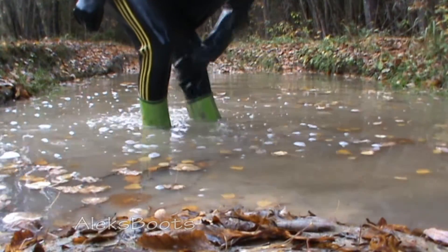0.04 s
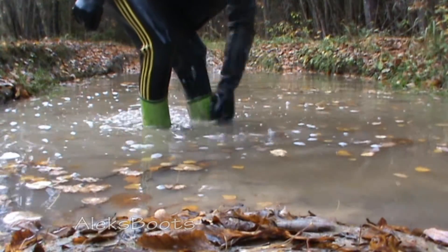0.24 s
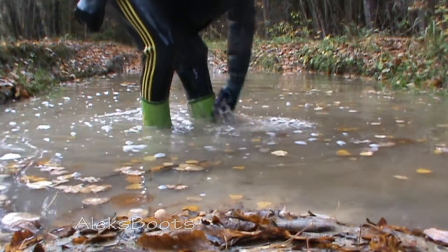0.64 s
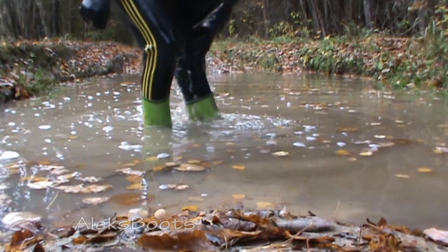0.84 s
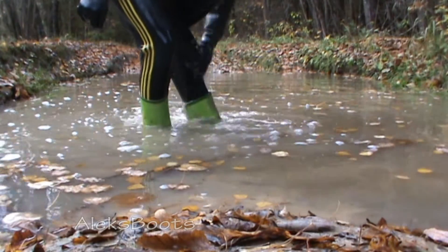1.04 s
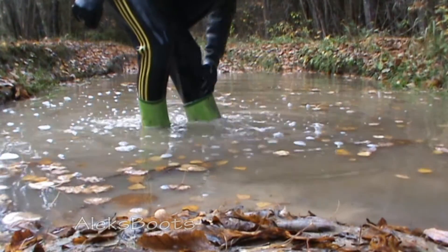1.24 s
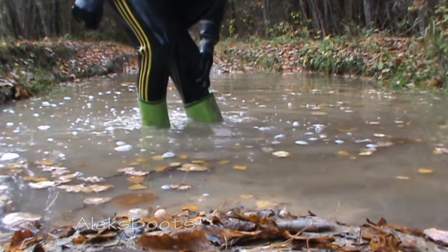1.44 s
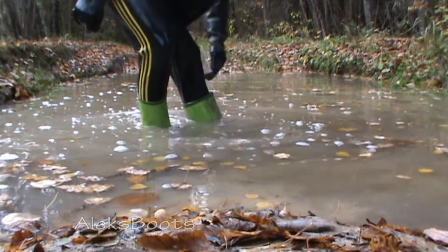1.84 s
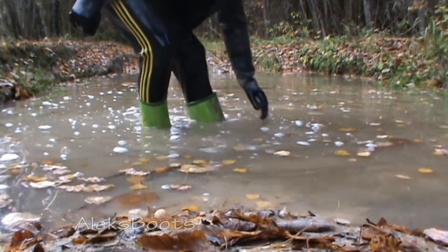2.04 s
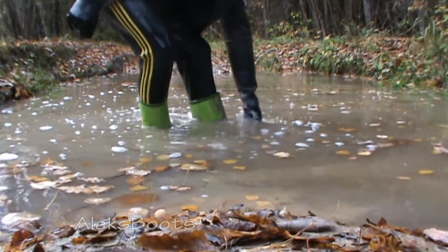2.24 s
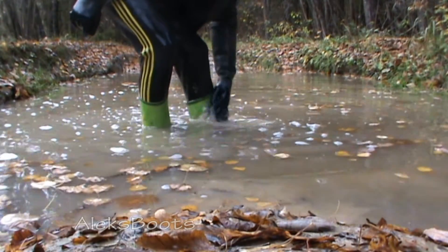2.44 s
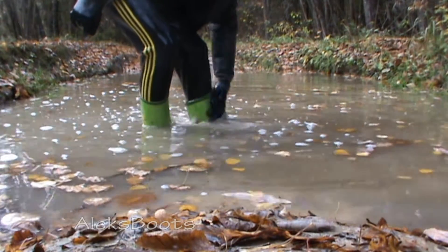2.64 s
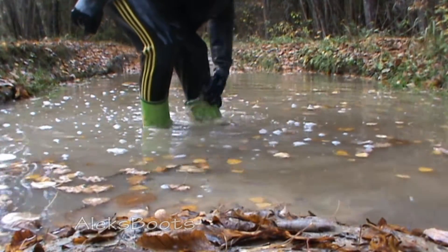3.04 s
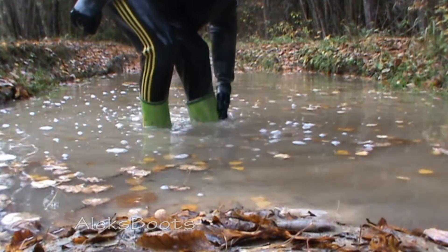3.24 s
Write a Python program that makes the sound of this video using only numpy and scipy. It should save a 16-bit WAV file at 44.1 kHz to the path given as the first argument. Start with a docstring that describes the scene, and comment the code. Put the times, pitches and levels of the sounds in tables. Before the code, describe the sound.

Pond water splashes and gurgles as a gloved hand scoops through it twice, a few metres away in a quiet wood. Drops patter back, a plop ends the first scoop, and faint dull boot knocks fall around the strokes.

```python
"""A gloved hand scoops and stirs a muddy pond twice, a few metres away in a wood.
The water churns with small rising bubbles, thrown drops patter back with a crack and a ping,
and one deep plop closes the first scoop as its cavity climbs in pitch.
A few dull knocks, probably rubber boots, fall around the strokes. The bank and the trees
add a short echo, and quiet outdoor air lies under it all."""
import sys
import numpy as np
from scipy import signal
from scipy.fft import rfft, irfft, next_fast_len
from scipy.io import wavfile
from scipy.ndimage import uniform_filter1d, map_coordinates

SR = 44100
rng = np.random.default_rng(int(sys.argv[2]) if len(sys.argv) > 2 else 0)


def generate_wav(signal):
    """Clip the signal to [-1, 1] and save it as 16-bit WAV at the path in sys.argv[1]."""
    frames = np.transpose(np.atleast_2d(signal))
    scaled = np.clip(frames, -1, 1) * 32767
    pcm = np.round(scaled).astype(np.int16)
    wavfile.write(sys.argv[1], SR, pcm)


N = 149940

# colour of the still air in the wood: frequency_hz, gain_db
AIR_TONE = [(20, -18), (55, 1.5), (105, -1.5), (330, -9), (1000, -14.5), (1220, -12), (2000, -21.5),
            (5000, -28.5), (10500, -24), (13500, -22.5), (15500, -58)]
# extra EQ on the air's side channel: frequency_hz, gain_db
AIR_SIDE_TONE = [(60, -23.5), (300, 5.5), (6000, 16), (13000, -2)]
# level envelopes of the two hand strokes: time_s, churn_db, spray_db
STROKE_LEVELS = [(0, -71, -58), (0.204, -61, -53), (.25, -53.5, -42), (.3, -45.5, -50), (0.394, -45.5, -51),
                 (0.415, -36.5, -36), (.475, -48.5, -48), (0.571, -46, -52), (0.588, -37.5, -42.5),
                 (.715, -35.5, -48), (.752, -43, -43), (.772, -45.5, -36), (.82, -45, -48),
                 (0.878, -41.5, -41), (0.961, -45, -48), (1.0, -57.5, -50), (1.04, -52.5, -45.5),
                 (1.1, -56, -52.5), (1.25, -60, -58.5), (1.67, -63, -60), (1.8, -80, -62.5),
                 (2.17, -66.5, -59), (2.3, -55, -54), (2.358, -45, -47.5), (2.42, -46, -50.5),
                 (2.49, -47.5, -52), (2.622, -49.5, -49.5), (2.638, -40.5, -37.5), (2.685, -42, -44.5),
                 (2.735, -45, -50.5), (2.79, -54, -55), (2.91, -55.5, -57), (2.966, -45, -47.5),
                 (3.083, -57, -59), (3.115, -55.5, -44.5), (3.145, -54, -54.5), (3.19, -50, -51),
                 (3.312, -65, -60.5), (3.4, -51.5, -49.5)]
# colour of the churning water: frequency_hz, gain_db
CHURN_TONE = [(60, -9), (200, -7.5), (400, -6), (700, -8), (1500, 3), (2500, 3), (4000, -7.5), (9000, -41)]
# colour of the spray: frequency_hz, gain_db
SPRAY_TONE = [(800, -11), (2600, -3), (4400, -0.5), (6000, 0.5), (7700, -6), (10000, 0.5), (13000, -9),
              (15500, -50)]
# drops hitting the surface: start_s, pitch_hz, level_db
DROP_HITS = [(0.0377, 4040, -36.5), (0.1216, 5750, -25.5), (0.247, 5140, -27), (0.2723, 8250, -27),
             (0.4176, 5400, -28), (0.4955, 10400, -29), (0.6267, 4760, -26), (0.6649, 3340, -17.5),
             (0.6685, 4500.0, -18), (0.7651, 4800, -14.5), (0.7658, 8400, -16), (0.791, 4400, -24),
             (0.8533, 3070, -20.5), (0.868, 5760, -17.5), (0.9363, 5500, -31.5), (0.9582, 5260, -16),
             (1.0392, 2940, -21.5), (1.136, 6200.0, -34), (1.3184, 7800, -33.5), (1.455, 5200, -39),
             (1.729, 4640, -38), (2.0545, 5200, -32), (2.406, 5450, -27.5), (2.517, 6860, -29),
             (2.568, 4440, -27.5), (2.58, 3670, -25.5), (2.6305, 6840, -18), (2.6694, 4070, -22),
             (2.703, 9600, -22.5), (2.7586, 7300, -23.5), (2.8425, 9100, -31.5), (3.108, 5630, -23.5),
             (3.1125, 4500, -26), (3.125, 6900, -32), (3.249, 6400, -26), (3.366, 5900, -34.5)]
# dull rubber knocks: start_s, level_db, t60_s, relative_bass_db
BOOT_KNOCKS = [(0.1174, -34.5, 0.029, 9.5), (0.126, -38.5, 0.041, 0), (1.508, -49.5, 0.07, 9.5),
               (1.665, -47.5, 0.018, 10.5), (2.1214, -33.5, 0.015, -22)]
# colour of a knock's slap: frequency_hz, gain_db
KNOCK_TONE = [(60, -26), (170, -48), (350, 8), (800, 10), (2400, -3.5), (3800, -2.5), (6000, -6.5),
              (14000, -15.5)]
# single bubbles of trapped air, plus a brief ring under the knock at 2.12 s: start_s, pitch_hz, level_db,
# t60_s, pitch_rise_share_per_s
TRAPPED_BUBBLES = [(0.3006, 2240, -28.5, 0.019, 15), (0.3605, 584, -29, 0.025, -1),
                   (0.3968, 710, -25.5, 0.032, -4), (0.41, 704, -30.5, 0.078, 4),
                   (0.439, 592, -35, 0.057, -4), (0.4687, 1474, -24.5, 0.1, 110),
                   (0.5061, 962, -31, 0.063, 6.5), (0.5854, 816, -21, 0.063, 13.5),
                   (0.6268, 1870, -29, 0.014, 94), (0.658, 427, -25.5, 0.018, -9),
                   (0.765, 732, -36, 0.13, 3.5), (0.852, 1478, -33, 0.11, -0.5),
                   (0.8643, 1220, -17, 0.011, 32), (0.8673, 2284, -19.5, 0.021, -5.5),
                   (0.8763, 1230, -25.5, 0.036, 42), (0.893, 3260, -20.5, 0.011, 1),
                   (0.895, 1204, -22.5, 0.012, 2), (0.9147, 1760, -28.5, 0.055, 48.5),
                   (1.5033, 1510, -35, 0.01, 1), (2.0002, 342, -35, 0.038, 1.5),
                   (2.0296, 453, -37, 0.024, 0), (2.1228, 1770, -18.5, 0.0032, -4),
                   (2.2045, 2490, -43.5, 0.039, 37), (2.221, 3920, -41.5, 0.027, 7),
                   (2.326, 2350, -32.5, 0.023, -5), (2.341, 3540, -29.5, 0.038, -0.5),
                   (2.3478, 1658, -23, 0.039, 16), (2.3539, 1426, -27, 0.06, 2.5),
                   (2.385, 596, -31, 0.02, -2), (2.403, 846, -31, 0.026, 9), (2.41, 532, -39, 0.056, -3),
                   (2.4207, 1505, -24.5, 0.02, -6), (2.527, 506, -45.5, 0.13, 4.5),
                   (2.543, 4350, -27, 0.013, 10), (2.595, 1630, -29.5, 0.017, 6),
                   (2.598, 2570, -36, 0.037, 16), (2.6727, 1554, -15, 0.015, -25),
                   (2.8154, 920, -21, 0.0035, 97.0), (2.844, 1330, -25.5, 0.006, -8),
                   (2.897, 1320, -36, 0.02, 23), (2.959, 2445, -31, 0.035, -2.5),
                   (2.974, 1080, -31, 0.02, 18), (3.0189, 1383, -30.5, 0.027, 21),
                   (3.1122, 2220, -30, 0.028, 8), (3.1237, 2740, -31, 0.01, 0.0),
                   (3.169, 2760, -36.5, 0.023, 10), (3.297, 338, -37.5, 0.019, 2)]
# decay of the echo from the trees: frequency_hz, t60_s
TREE_DECAY = [(500, 0.15), (10000, 0.087)]
# stereo width of the echoes: frequency_hz, side_gain_db
ECHO_WIDTH = [(300, -17), (7000, -6), (12500, 0)]


def amp(db):
    """Decibels to gain."""
    return 10 ** (np.asarray(db) / 20)


def unit(x):
    """Scale to rms 1."""
    return x / np.sqrt(np.mean(x ** 2) + 1e-20)


def along(points, hz):
    """Read (frequency_hz, value) points on a log frequency axis."""
    frequencies, values = np.transpose(points)
    return np.interp(np.log(hz + 1), np.log(frequencies + 1), values)


def filtered(x, response):
    """Zero-phase EQ; response gives the gain at each frequency."""
    n = x.shape[-1]
    padded = next_fast_len(n + 8192)
    return irfft(rfft(x, padded) * response(np.fft.rfftfreq(padded, 1 / SR)), padded)[..., :n]


def noise(tone):
    """Coloured noise of rms 1."""
    return unit(filtered(rng.standard_normal(N), lambda hz: amp(along(tone, hz))))


def wobble(rate):
    """A smooth random curve, rate knots a second."""
    return map_coordinates(rng.standard_normal(2048), [np.arange(N) * rate / SR], mode="wrap")


def add(track, start_s, sound):
    """Mix a sound into the track."""
    i = max(0, round(start_s * SR))
    track[i:i + len(sound)] += sound[:max(0, N - i)]


def decay(t, t60):
    """An envelope that falls 60 dB in t60 seconds."""
    return np.exp(-np.log(1000) * t / t60)


def ring(t, hz, t60, rise=0, onset_cycles=0.4):
    """A damped sine with a soft attack; its pitch glides by the share rise each second."""
    attack = 1 - np.exp(-hz * t / onset_cycles)
    return np.sin(2 * np.pi * hz * t * (1 + rise * t / 2)) * decay(t, t60) * attack


def air():
    """A faint, steady stereo bed of outdoor noise, centred in the bass and wide in the treble."""
    side = amp(-9) * filtered(noise(AIR_TONE), lambda hz: amp(along(AIR_SIDE_TONE, hz)))
    mid = noise(AIR_TONE)
    return amp(-58) * np.array([mid + side, mid - side])


def swarm(tone, centre_hz, octaves, cycles, climb, spread_db, count, grain_samples):
    """A cloud of tiny bubbles ringing at random times, levelled to a steady rms of 1."""
    position, climb_share = rng.random((count, 2)).T[:, :, None]
    pitch_draw, decay_draw, level_draw = rng.standard_normal((count, 3)).T[:, :, None]
    t = np.arange(grain_samples) / SR
    hz = np.clip(centre_hz * 2 ** (octaves * 2 * np.tanh(pitch_draw / 2)), 200, 14000)
    t60 = np.minimum(cycles / hz * np.exp(decay_draw / 2), t[-1])
    gain = amp(spread_db * 2 * np.tanh(level_draw / 2))
    grains = gain * ring(t, hz, t60, climb * climb_share / t60, onset_cycles=1.76)
    indices = (position * N).astype(int) + np.arange(grain_samples)
    cloud = np.bincount(indices.ravel(), grains.ravel(), N)[:N]
    cloud = filtered(cloud, lambda hz: amp(along(tone, hz) / 2))
    return cloud / np.sqrt(np.abs(uniform_filter1d(cloud ** 2, SR // 16)) + 1e-12)


def breaking(level, still_db=-56.5):
    """A soft gate: below still_db the water only laps and hardly any bubbles form."""
    return 1 / (1 + (amp(still_db) / level) ** 4)


def hand_strokes():
    """The moving hand churns up bubbles and throws pinging spray, each on a bed of rushing water."""
    time_s, churn_db, spray_db = np.transpose(STROKE_LEVELS)
    churn_level = amp(np.interp(np.arange(N) / SR, time_s, churn_db))
    spray_level = amp(np.interp(np.arange(N) / SR, time_s, spray_db))
    gurgle = swarm(CHURN_TONE, centre_hz=1418.5, octaves=0.97, cycles=17.7, climb=0.34,
                   spread_db=6.0, count=3200, grain_samples=1500)
    pings = swarm(SPRAY_TONE, centre_hz=7040, octaves=0.695, cycles=19, climb=0.076,
                  spread_db=12.5, count=5200, grain_samples=500)
    rush = amp(-7.5) * noise(CHURN_TONE) * amp(4.85 * wobble(rate=130))
    fizz = amp(-7.5) * noise(SPRAY_TONE) * amp(4.85 * wobble(rate=220))
    churn = amp(-2) * breaking(churn_level) * gurgle + rush
    spray = amp(-1.5) * breaking(spray_level) * pings + fizz
    return churn_level * churn + spray_level * spray


def drops(ring_cycles=24, crack_db=-10.5):
    """Each falling drop cracks on the surface and rings briefly."""
    out, t = np.zeros(N), np.arange(SR // 40) / SR
    splash = noise(SPRAY_TONE)
    for start_s, hz, level_db in DROP_HITS:
        crack = splash[round(start_s * SR):][:len(t)] * decay(t, t60=0.013)
        ping = ring(t, hz, t60=ring_cycles / hz)
        add(out, start_s, amp(level_db) * (ping + amp(crack_db) * crack))
    return out


def boot_knocks():
    """Short dull bumps of rubber: a soft slap over a low thud."""
    out, t = np.zeros(N), np.arange(SR // 10) / SR
    rubber = noise(KNOCK_TONE)
    for start_s, level_db, t60, bass_db in BOOT_KNOCKS:
        attack = 1 - np.exp(-t / (0.075 * t60))
        slap = amp(5.5) * rubber[round(start_s * SR):][:len(t)] * decay(t, t60) * attack
        thud = amp(bass_db) * ring(t, hz=181, t60=t60)
        add(out, start_s, amp(level_db) * (slap + thud))
    return out


def bubbles():
    """The larger bubbles ring out one by one; a fast climber is cut short at the surface."""
    out, t = np.zeros(N), np.arange(SR // 10) / SR
    for start_s, hz, level_db, t60, rise in TRAPPED_BUBBLES:
        surfacing = np.exp(-(rise * t) ** 2)
        add(out, start_s, amp(level_db) * ring(t, hz, t60, rise) * surfacing)
    return out


def plop(start_s=1.0885, low_hz=374, high_hz=941):
    """A blob of water lands with a slap; its cavity swells, climbs in pitch near the surface and fades."""
    out, t = np.zeros(N), np.arange(SR // 7) / SR
    glide_mid_s, glide_s, swell_s = 0.03, 0.0128, 0.029
    hz = low_hz + (high_hz - low_hz) / (1 + np.exp((glide_mid_s - t) / glide_s))
    swell = amp(-4 * np.clip(1 - t / swell_s, 0, 1))
    fade = decay(np.maximum(t - swell_s, 0), t60=0.088)
    cavity = amp(-27.5) * swell * fade * np.sin(2 * np.pi * np.cumsum(hz) / SR)
    slap = amp(-28) * ring(t, hz=1600, t60=0.01)
    add(out, start_s, cavity + slap)
    return out


def surroundings(x, trees_db=-9.5, bank_db=-16.5):
    """Stereo reverb: the near bank answers within milliseconds and the trees add a faint tail."""
    hz, frame_s, spectrum = signal.stft(rng.standard_normal((2, SR // 2)), SR, nperseg=256)
    trees = signal.istft(spectrum * decay(frame_s, along(TREE_DECAY, hz)[:, None]), SR, nperseg=256)[1]
    t = np.arange(trees.shape[1]) / SR
    bank = rng.standard_normal(trees.shape) * decay(t, t60=0.059)
    echo = amp(trees_db) * trees / np.linalg.norm(trees[0])
    echo += amp(bank_db) * bank / np.linalg.norm(bank[0])
    mid = echo.mean(0)
    side = filtered(echo - mid, lambda hz: amp(along(ECHO_WIDTH, hz)))
    return signal.fftconvolve(x[None], mid + side, axes=1)[:, :N]


def low_cut(x, hz):
    """A high-pass: the bubbles and drops carry no bass."""
    return signal.sosfilt(signal.butter(2, hz, "high", fs=SR, output="sos"), x)


def scene():
    """Water and knocks sit dead centre, with the echo and the air spread around them."""
    water = hand_strokes() + low_cut(bubbles() + plop(), hz=250) + low_cut(drops(), hz=890)
    direct = water + boot_knocks()
    return direct + surroundings(direct) + air()


def record(dry):
    """A steep high cut takes off the very top of the mix."""
    cutoff_hz = 15100
    return filtered(dry, lambda hz: 1 / (1 + (hz / cutoff_hz) ** 80))


dry = scene()
out = record(dry)
generate_wav(out)
```